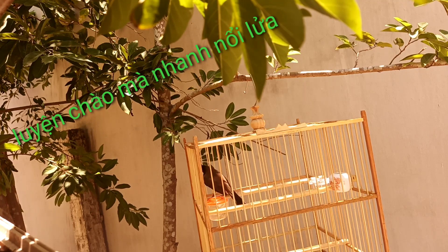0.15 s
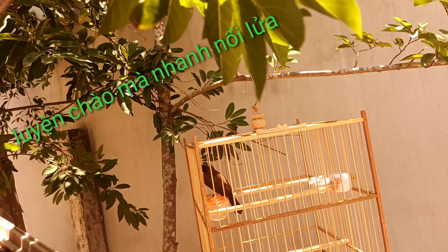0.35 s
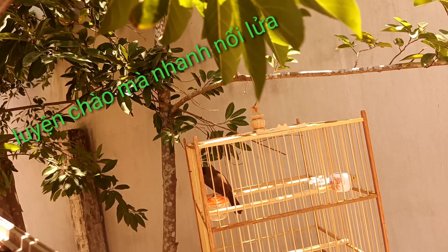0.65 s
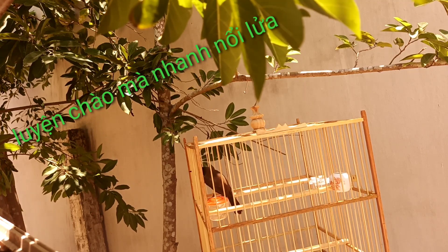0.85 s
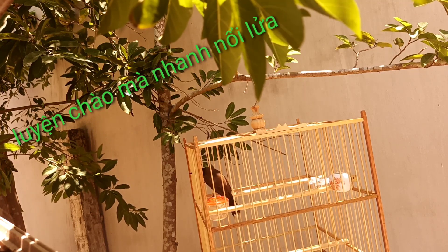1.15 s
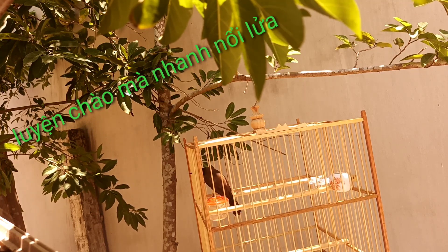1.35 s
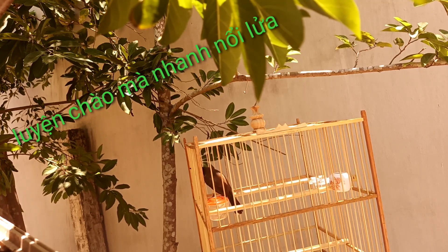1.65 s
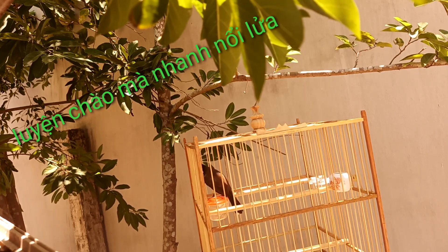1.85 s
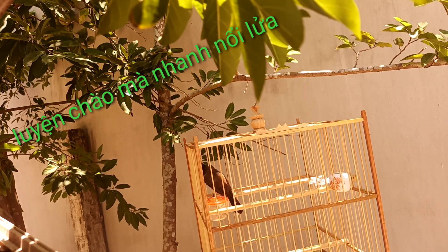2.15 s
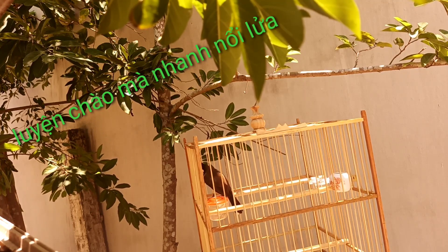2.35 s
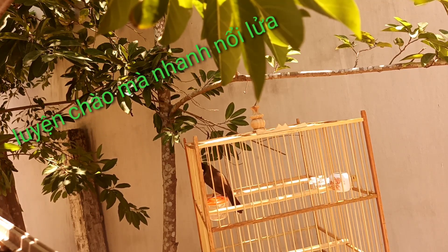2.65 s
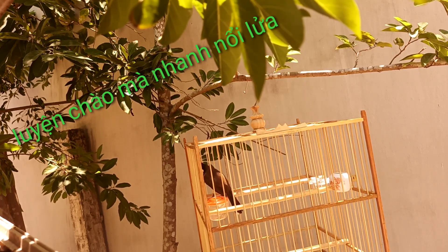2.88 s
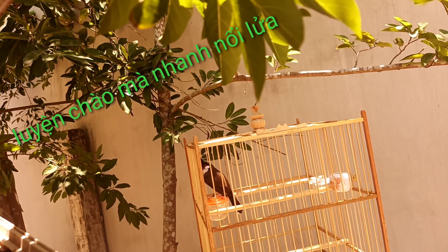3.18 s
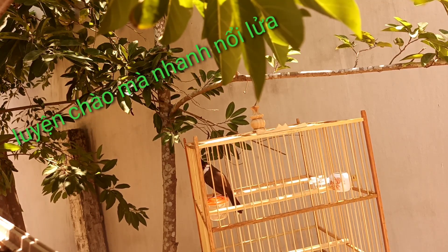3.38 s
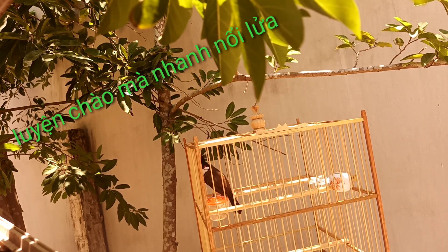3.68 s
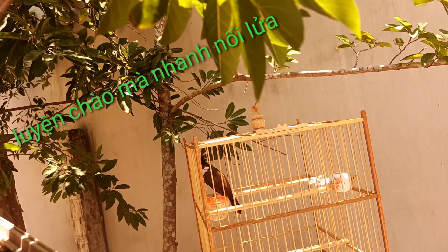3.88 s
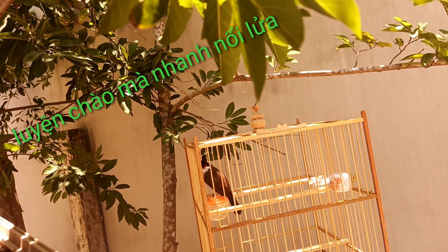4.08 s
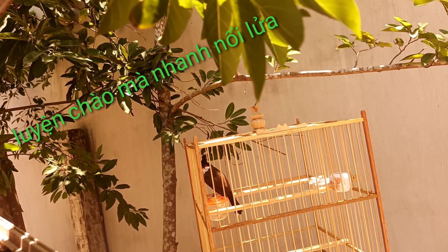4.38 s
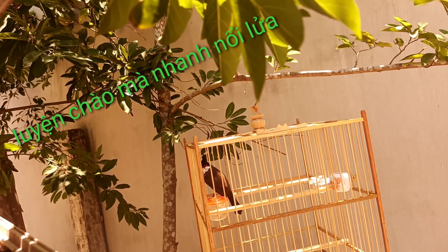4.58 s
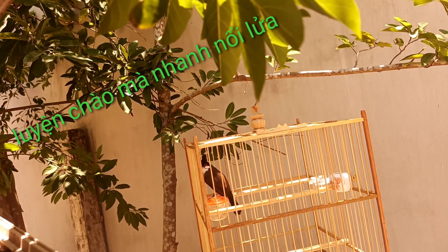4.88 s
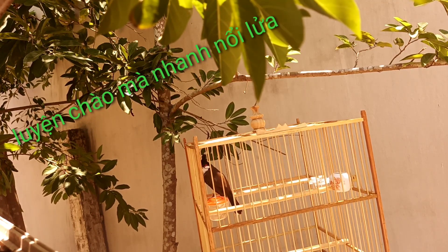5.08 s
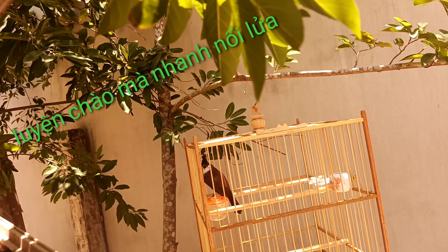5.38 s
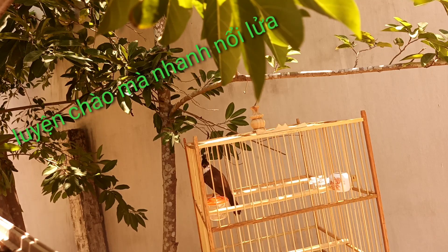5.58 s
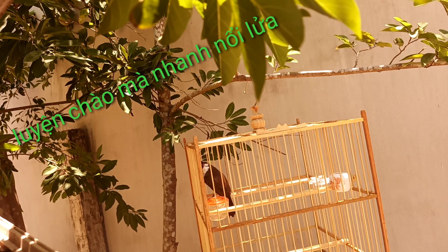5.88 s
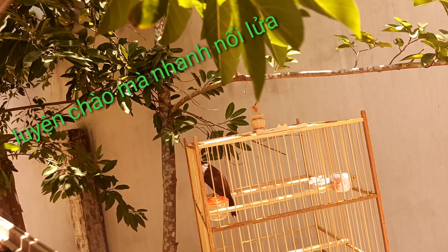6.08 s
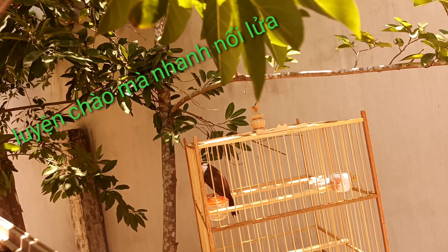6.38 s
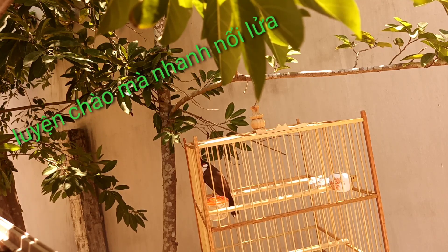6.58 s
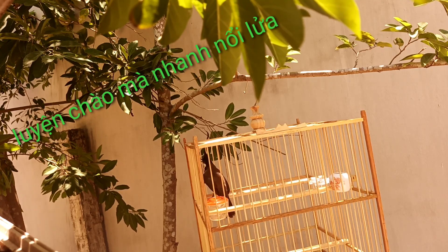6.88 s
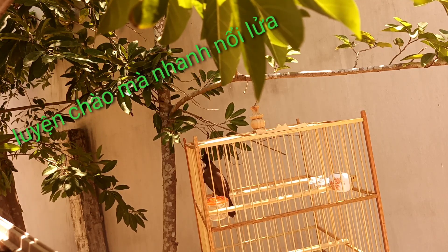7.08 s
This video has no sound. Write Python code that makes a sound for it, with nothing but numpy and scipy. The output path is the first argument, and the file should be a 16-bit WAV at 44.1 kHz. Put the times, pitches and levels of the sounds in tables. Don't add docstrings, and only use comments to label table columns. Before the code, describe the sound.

A caged songbird whistles short bright phrases in a walled yard, with long pauses over steady high cicada hiss and very faint distant birds.

```python
import sys
import numpy as np
from scipy import signal
from scipy.fft import rfft, irfft
from scipy.io import wavfile

SR = 44100
rng = np.random.default_rng(int(sys.argv[2]) if len(sys.argv) > 2 else 0)


def unload_wav(signal):
    wavfile.write(
        sys.argv[1],
        SR,
        np.round(np.clip(np.atleast_2d(signal).T, -1, 1) * 32767).astype(np.int16),
    )


def invert_db(x):
    u = np.asarray(x, float) / 20
    return 10 ** u


N = 319284

# f/Hz, level/dB
AIR = [(12, -39.5), (30, -9), (42, -4), (113, -10.5), (268, -10), (829, -11.5), (1130, -11.5),
       (1260, -10.5), (3070, -17.5), (4000, -17.5), (5200, -36), (8800, -120)]
AIR_DB = -71
# f/Hz, density/(dB per Hz)
GUST = [(20, -32.5), (50, -8), (115, 10), (160, -3), (300, -37.5)]
# t/s, length/s, level/dB
WIND = [(0.004, 0.15, -70), (0.474, 0.24, -63), (0.808, 0.12, -72.5), (1.258, 0.032, -75),
        (1.328, 0.084, -74), (1.721, 0.035, -76.5), (1.939, 0.032, -78), (2.205, 0.07, -69),
        (2.399, 0.054, -74), (2.646, 0.077, -77.5), (2.858, 0.05, -77), (3.517, 0.146, -79),
        (3.918, 0.048, -71), (5.319, 0.22, -70.5), (5.789, 0.088, -76), (6.626, 0.051, -76),
        (6.724, 0.13, -73.5), (6.984, 0.27, -73.5)]
GUST_EDGE_S, BREEZE_DB, BREEZE_LUMPS_DB = .1, -82.5, 3.5
# f/Hz, density/(dB per Hz)
CHORUS = [(1880, -64.5), (3200, -48), (4060, -25.5), (4460, -12), (4920, -8.5), (5510, -3), (5890, -4),
          (6420, 1.5), (7470, -4), (7990, -12.5), (9810, -28), (11700, -42.5), (13600, -48), (14900, -37),
          (15600, -37)]
CICADA_DB = -52

# t/s, length/s, level/dB, pitch f/Hz
DOVES = [(0.014, 0.19, -70, 760), (0.704, 0.058, -64.5, 725), (1.195, 0.093, -65.5, 799),
         (1.409, 0.21, -71.5, 809), (2.159, 0.03, -72.5, 622), (2.237, 0.038, -67.5, 830),
         (2.582, 0.044, -69, 622), (2.762, 0.47, -73.5, 767), (3.271, 0.086, -72, 749),
         (3.62, 0.12, -70, 681), (3.961, 0.046, -70, 674), (4.045, 0.27, -68, 700),
         (4.574, 0.094, -68, 753), (4.861, 0.067, -71.5, 690), (5.086, 0.4, -68.5, 679),
         (5.512, 0.033, -68, 750), (5.605, 0.027, -66, 762), (5.673, 0.12, -69.5, 759),
         (5.889, 0.035, -66, 671), (6.022, 0.13, -72.5, 724), (6.272, 0.24, -74, 722),
         (6.511, 0.036, -73, 673), (6.671, 0.112, -73, 810), (7.042, 0.14, -67, 765)]
COO_EDGE_S, COO_ROLL_DB, COO_WANDER_HZ, COO_BED_DB = .06, 2.5, 50.6, -87
# t/s, length/s, first f/Hz, last f/Hz, level/dB
HOOTS = [
    (1.68, .09, 325, 332, -81),
    (3.18, .064, 269.5, 250.7, -75),
    (3.66, 0.078, 248, 256.3, -70),
    (4.95, 0.094, 251, 324, -73.5),
    (6.2, 0.085, 310, 306, -82),
]
# t/s, length/s, first f/Hz, last f/Hz, level/dB
CROWS = [
    (1.67, 0.12, 542, 546.5, -74.5),
    (1.8, .24, 578, 628.5, -75),
    (3.18, 0.27, 428.4, 529.4, -75.5),
    (3.5, 0.4, 325, 323, -81),
    (4.24, 0.095, 409, 399, -76.5),
    (4.57, 0.09, 538, 291, -81),
    (5.43, 0.15, 424, 430, -78.5),
]
# multiple of pitch/1, level/dB
CROW_PARTIALS = [(2.001, -1.5), (3.0, 2), (4.002, -8)]
# t/s, length/s, first f/Hz, last f/Hz, level/dB
FAR_WHISTLES = [
    (3.97, 0.069, 2145, 2410, -61),
    (4.09, 0.037, 3100, 3140, -58.5),
    (4.175, .06, 2100, 2220, -66),
    (4.3, .055, 3050, 2996, -58.5),
    (5.43, 0.062, 2100, 2105, -79),
    (6.16, 0.061, 1600, 1600, -72),
    (6.18, .09, 2850, 2536, -57.5),
    (6.66, 0.12, 1600, 1550, -85),
]
# t/s, length/s, first f/Hz, last f/Hz, level/dB
FAR_BIRDS = [
    (0, 0.029, 3550, 3580, -45.5),
    (.01, .29, 2950, 2780, -55),
    (.05, 0.14, 1504, 1498, -65),
    (2.25, 0.065, 1805, 2315, -74.5),
    (3.67, 0.13, 3267, 2720, -64),
    (4.26, 0.13, 2300, 2900, -66),
    (5.66, 0.098, 3100, 4250, -55),
    (6.09, .098, 2415, 2806, -65),
    (6.33, 0.081, 3300, 3900, -75),
    (6.57, 0.086, 3130, 4200, -71),
]
BIRD_BUZZ, WHISTLE_BUZZ, CROW_BUZZ, HOOT_BUZZ = .55, .25, .3, 0.32

# delay t/s, level/dB
ECHOES = [(.004, -12), (.009, -6.5), (.017, -16.5), (.031, -27)]
YARD_T60_S, YARD_DB = .38, -20

# multiple of pitch/1, level/dB
PARTIALS = [(1.5, -50), (2.001, -37), (3.0, -45), (4.0, -57), (5.0, -49), (6.0, -54)]
# f/Hz, density/(dB per Hz)
BREATH = [(1000, -29), (4500, -11), (9000, -0.5), (12000, -22), (13800, -24), (15200, -3), (16000, -16)]
# t/s, level/dB
SNAPS = [
    (.259, -31),
    (4.727, -27.5),
    (5.914, -17.5),
    (6.84, -36),
]
# t/s, f/Hz, level/dB
ARC = [(0, 2330, -50), (.01, 2490, -30), (.022, 2880, -24), (.052, 3260, -20), (.075, 3420, -20.5),
       (.1, 3440, -20.5), (.128, 3180, -21.5), (.146, 2900, -25.5), (.154, 2820, -38)]
# t/s, f/Hz, level/dB
RISE = [(0, 2850, -53), (.009, 3010, -34), (.022, 3284, -21), (.045, 3612, -20.5), (.06, 3774, -19),
        (.078, 3920, -18), (.11, 3830, -22), (.12, 3780, -38.5)]
# t/s, f/Hz, level/dB
HIGH_RISE = [(0, 2744, -51.5), (.013, 3222, -28), (.022, 3426, -19), (.053, 3650, -16.5), (.075, 3955, -19),
             (.095, 4187, -20.5), (.112, 4150, -29.5), (.13, 4038, -40)]
# t/s, f/Hz, level/dB
LEAP = [(0, 1400, -57), (.024, 1559, -45.5), (.028, 1900, -38.5), (.042, 2184, -31.5), (.054, 2395, -24.5),
        (.062, 2480, -34), (.077, 2720, -48.5)]
# t/s, f/Hz, level/dB
HOOK = [(0, 1646, -53), (.01, 1810, -38), (.026, 1999, -31), (.031, 2547, -32), (.044, 3002, -25),
        (.054, 3184, -16.5), (.066, 3190, -20), (.076, 3190, -33), (.102, 3204, -39.5)]
# t/s, f/Hz, level/dB
FLICK = [(0, 2318, -33), (.006, 2450, -28), (.013, 2602, -33), (.022, 3015, -31.5), (.041, 3195, -47.5)]
# t/s, f/Hz, level/dB
PIPE = [(0, 3560, -40), (.012, 3574, -23), (.026, 3668, -18), (.036, 3687, -17), (.041, 3710, -31.5),
        (.054, 3676, -24), (.072, 3745, -37)]
# t/s, f/Hz, level/dB
CLIMB = [(0, 1720, -51.5), (.012, 2050, -37.5), (.022, 2300, -24.5), (.038, 2440, -35), (.05, 2590, -34),
         (.092, 2930, -29.5)]
# t/s, f/Hz, level/dB
CAP = [(0, 3260, -23), (.014, 3664, -24), (.028, 3660, -37), (.045, 3590, -30.5)]
# t/s, f/Hz, level/dB
LOW_RISE = [(0, 1846, -42), (.008, 2008, -37.5), (.026, 2517, -32), (.046, 2630, -35), (.054, 2620, -48)]
# t/s, f/Hz, level/dB
MURMUR = [(0, 1590, -48), (.02, 1754, -39), (.028, 1790, -44), (.059, 1732, -46.5)]
# syllable, t/s, gain/dB, pressure/dB, buzz depth/1
SUNG = [(ARC, .247, .1, -5, .55), (LEAP, 0.6222, .1, 6, .3), (HOOK, .733, .1, 4.1, .22),
        (FLICK, .849, .1, 3, .25), (PIPE, 0.95, .1, 2.2, .15), (CLIMB, 1.053, 0.083, 3.9, .28),
        (CAP, 1.135, 0.088, -7, 0.568), (LOW_RISE, 1.212, .1, .1, 0.41), (MURMUR, 1.273, .1, 11, 0.58),
        (RISE, 4.718, 1.2, 1.3, .55), (HIGH_RISE, 5.9, .1, 3, .5), (ARC, 6.828, .1, 1.17, .55),
        (LEAP, 7.119, 1.4, 5, .3), (HOOK, 7.226, 2.58, 2, .25)]
CATCH_S, CATCH_DB, CATCH_BUZZ = 0.036, 6.5, .8
UNDERTONE_DB, UNDERTONE_RISE_DB, UNDERTONE_FLICKER_DB = -50, 14.5, 3.5
BUZZ_HZ, CATCH_HZ = 255, 70
SETTLE_S = .004
THROAT_HZ, THROAT_WIDTH_HZ, THROAT_DB = 2988, 900, 4
BEAK_HZ, BEAK_WIDTH_HZ, BEAK_DB = 6360, 900, 11

PORT_HZ, PORT_WIDTH_HZ, PORT_DB = 15400, 800, 9
CUTOFF_HZ = 15900


def rms_one(x):
    return x / np.sqrt(np.mean(x ** 2) + 1e-20)


def in_time(rows, t):
    s, *columns = np.transpose(rows)
    return [np.interp(t, s, c) for c in columns]


def drift(rate, count=N):
    r = np.exp(-2 * np.pi * rate / SR)
    noise = rng.standard_normal(count + 20000)
    return rms_one(signal.lfilter([1], [1, -2 * r, r * r], noise)[20000:])


def coloured(spectrum):
    hz, db = np.transpose(spectrum)
    log_hz = np.log(np.fft.rfftfreq(N, 1 / SR) + 1)
    gain = invert_db(np.interp(log_hz, np.log(hz), db, -90, -90))
    return rms_one(irfft(rfft(rng.standard_normal(N)) * gain, N))


def tail(x, t60, onset_s):
    t = np.arange(SR) / SR
    response = rng.standard_normal(SR) * invert_db(-60 * t / t60) * (1 - np.exp(-t / onset_s))
    return signal.fftconvolve(x, response / np.sqrt(np.sum(response ** 2)))[:N]


def resonance(hz, width_hz, db):
    r = np.exp(-np.pi * width_hz / SR)
    a = np.array([1, -2 * r * np.cos(2 * np.pi * hz / SR), r * r])
    return a + invert_db(db) * (1 - r * r) / 2 * np.array([1, 0, -1]), a


def fades(t, rise_s, fall_s):
    ramp = np.minimum((t - t[0]) / rise_s, (t[-1] - t) / fall_s)
    return np.sin(np.pi / 2 * np.clip(ramp, 0, 1)) ** 2


def swells(rows, t, edge_s):
    gain = 0
    for start, length, db, *_ in rows:
        inside_s = np.minimum(t - start, start + length - t)
        gain = gain + invert_db(db) * np.clip(inside_s / edge_s + 0.52, 0, 1) ** 2
    return gain


def syrinx(pitch_hz, depth, rate_hz, partials, wobble, swing_hz):
    throb = 2 * np.pi * np.cumsum(rate_hz * (1 + .13 * wobble[0])) / SR
    depth = np.clip(depth, 0, 1.2) * invert_db(2.3 * wobble[1])
    lean = np.tanh((np.mean(pitch_hz) - pitch_hz) / 250)
    swing = swing_hz * depth * (0.3 * np.sin(throb) + 0.8 * lean * np.cos(throb) + .7 * wobble[2])
    phase = 2 * np.pi * np.cumsum(pitch_hz + swing) / SR
    heard = [(k, db) for k, db in partials if k * np.max(pitch_hz) < SR / 2]
    tone = sum(invert_db(db) * np.sin(k * phase) for k, db in heard)
    pulses = 1 + depth * (np.cos(throb) + 0.078 * np.cos(2 * throb))
    return np.sqrt(2) * tone * pulses / np.sqrt(1 + depth ** 2 / 2)


def air(patchy_db):
    noise, edges = coloured(AIR), np.geomspace(30, 4800, 16)
    out = np.zeros(N)
    for edge in zip(edges, edges[1:]):
        band = signal.sosfilt(signal.butter(2, edge, "band", fs=SR, output="sos"), noise)
        out += invert_db(patchy_db * drift(5)) * band
    return invert_db(AIR_DB) * out


def wind(t):
    push = invert_db(BREEZE_DB + BREEZE_LUMPS_DB * drift(3.6)) + swells(WIND, t, GUST_EDGE_S)
    return push * invert_db(1.5 * drift(29)) * coloured(GUST)


def cicadas():
    flutter_db = 0.67 * drift(200) + 0.52 * drift(25) + .5 * drift(1.7)
    return invert_db(CICADA_DB + flutter_db) * coloured(CHORUS)


def doves(t):
    start, length, _, coo_hz = np.transpose(DOVES)
    pitch_hz = np.interp(t, start + length / 2, coo_hz) + COO_WANDER_HZ * drift(6.1)
    wobble = np.array([drift(8.7), drift(20), drift(59)])
    coo = syrinx(pitch_hz, 0.68, 130, [(1, -1.5), (2.001, -20)], wobble, swing_hz=86.5)
    level = invert_db(COO_BED_DB) + swells(DOVES, t, COO_EDGE_S)
    return tail(level * invert_db(COO_ROLL_DB * drift(8)) * coo, 0.069, 0.001)


def far_calls(calls, partials, depth, rate_hz, swing_hz):
    out, wobble = np.zeros(N), np.array([drift(72), drift(70), drift(150)])
    for start, length, first_hz, last_hz, level_db in calls:
        at = np.arange(max(round(start * SR), 0), round((start + length) * SR))
        glide = np.linspace(first_hz, last_hz, len(at))
        call = syrinx(glide, depth, rate_hz, partials, wobble[:, at], swing_hz)
        out[at] += invert_db(level_db) * fades(at / SR, 0.0074, 0.04) * call
    return invert_db(-9) * out + tail(out, .45, .01)


def yard(x):
    out = x + invert_db(YARD_DB) * tail(x, YARD_T60_S, 0.023)
    for delay_s, db in ECHOES:
        lag = round(delay_s * SR)
        out[lag:] += invert_db(db) * x[:-lag]
    return out


def snaps():
    out, t = np.zeros(N), np.arange(SR // 50) / SR
    for start, level_db in SNAPS:
        burst = rng.standard_normal(len(t)) * t / 0.0017 * np.exp(-t / .002)
        out[round(start * SR):][:len(t)] += invert_db(level_db) * burst
    return signal.sosfilt(signal.butter(3, [2600, 4400], "band", fs=SR, output="sos"), out + 1e-18)


def bulbul():
    out, rush = np.zeros(N), coloured(BREATH)
    wobble = np.array([drift(60), drift(120), drift(220)])
    throat = resonance(THROAT_HZ, THROAT_WIDTH_HZ, THROAT_DB)
    for syllable, start, louder_db, press_db, buzz in SUNG:
        t = np.arange(round(syllable[-1][0] * SR)) / SR
        at = np.arange(round(start * SR), N)[:len(t)]
        shape = fades(t, .004, 0.0045)[:len(at)]
        t, unsteady = t[:len(at)], wobble[:, at]
        pitch_hz, level_db = in_time(syllable, t)
        catch = np.exp(-t / CATCH_S)
        depth = buzz * (1 + CATCH_BUZZ * catch) * (1 - np.exp(-t / SETTLE_S))
        rate_hz = BUZZ_HZ + CATCH_HZ * catch
        whistle = syrinx(pitch_hz, depth, rate_hz, [(1, 0.0013)], unsteady, swing_hz=140.4)
        whistle = whistle / np.abs(signal.freqz(*throat, pitch_hz, fs=SR)[1])
        overtones = syrinx(pitch_hz, depth + 0.21, rate_hz, PARTIALS, unsteady, swing_hz=200)
        pressed = invert_db(press_db + CATCH_DB * catch) * (overtones + invert_db(-45.5) * rush[at])
        under = syrinx(pitch_hz, 0.092, rate_hz, [(.5, UNDERTONE_DB)], unsteady, swing_hz=300)
        under = under * invert_db(UNDERTONE_FLICKER_DB * unsteady[0] - UNDERTONE_RISE_DB * catch)
        out[at] += invert_db(level_db + louder_db - 1.5) * shape * (whistle + under + pressed)
    voiced = signal.lfilter(*throat, out + 1e-18) + snaps()
    voiced = signal.sosfilt(signal.butter(2, 900, "high", fs=SR, output="sos"), voiced)
    return signal.lfilter(*resonance(BEAK_HZ, BEAK_WIDTH_HZ, BEAK_DB), voiced)


def scene():
    t = np.arange(N) / SR
    background = air(patchy_db=2.0) + wind(t) + cicadas()
    far = doves(t) + far_calls(HOOTS, [(1, 0)], HOOT_BUZZ, rate_hz=60, swing_hz=40)
    far += far_calls(CROWS, CROW_PARTIALS, CROW_BUZZ, rate_hz=95, swing_hz=60)
    far += far_calls(FAR_WHISTLES, [(1, 0)], WHISTLE_BUZZ, rate_hz=270, swing_hz=220)
    far += far_calls(FAR_BIRDS, [(0.99, 0.0039)], BIRD_BUZZ, rate_hz=390, swing_hz=223)
    return (background + far + yard(bulbul()))[None]


def low_pass(x):
    return signal.sosfilt(signal.butter(12, 15770, fs=SR, output="sos"), x)


def record(dry):
    rounded = 1.6 * np.tanh(dry / 1.6)
    port = signal.lfilter(*resonance(PORT_HZ, PORT_WIDTH_HZ, PORT_DB), rounded)
    port = signal.sosfilt(signal.butter(2, 45, "high", fs=SR, output="sos"), port)
    mix = signal.sosfilt(signal.cheby2(12, 60, CUTOFF_HZ, fs=SR, output="sos"), port)
    return low_pass(mix)


dry = scene()
out = record(dry)
unload_wav(out)
```